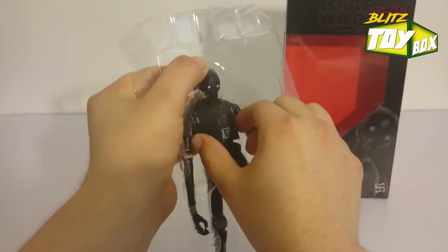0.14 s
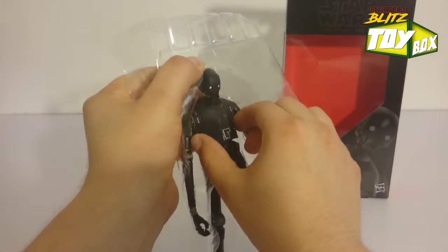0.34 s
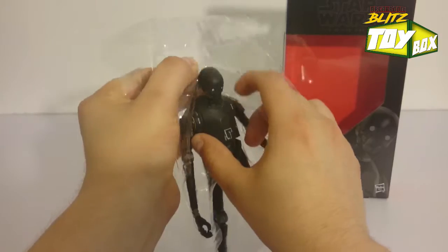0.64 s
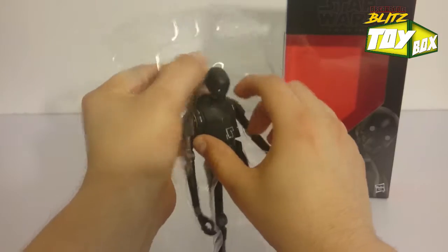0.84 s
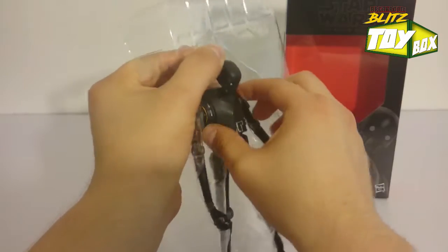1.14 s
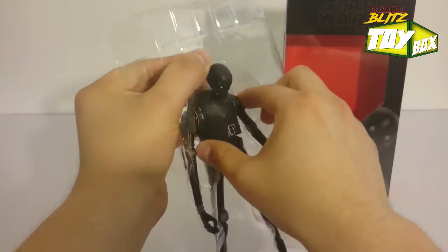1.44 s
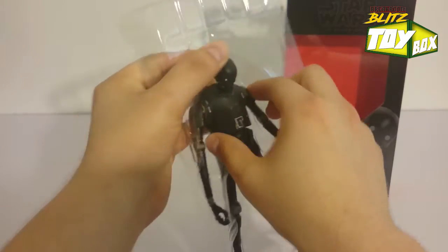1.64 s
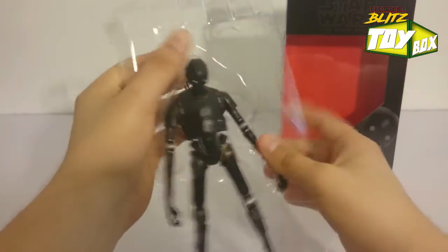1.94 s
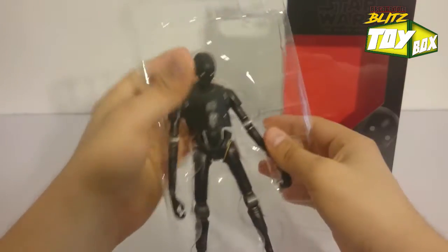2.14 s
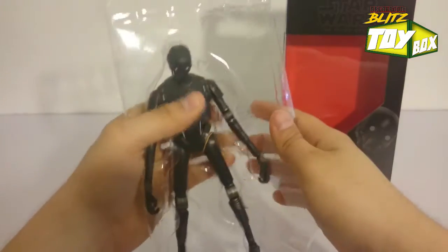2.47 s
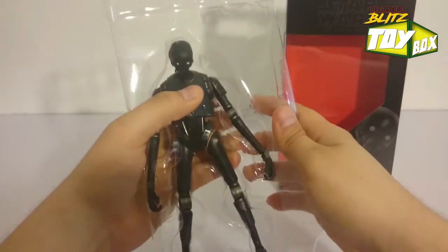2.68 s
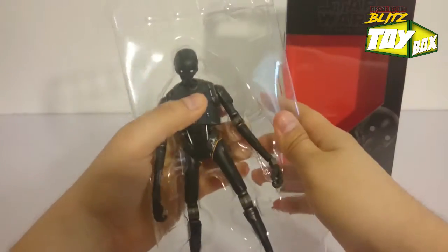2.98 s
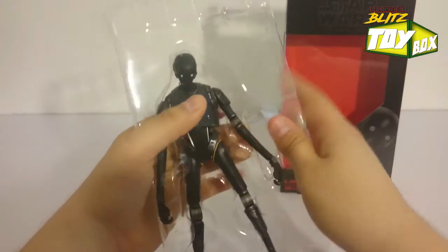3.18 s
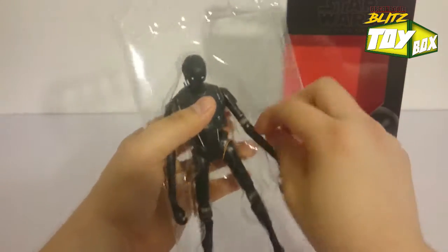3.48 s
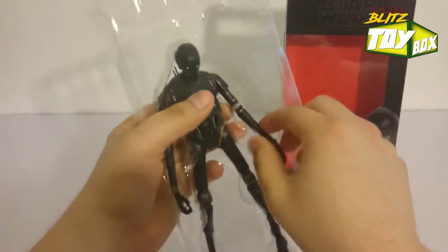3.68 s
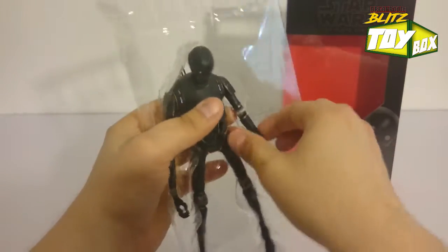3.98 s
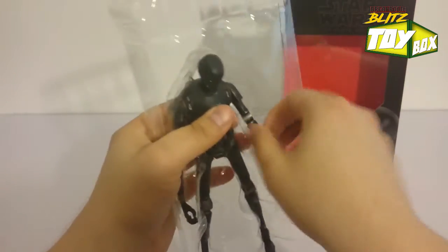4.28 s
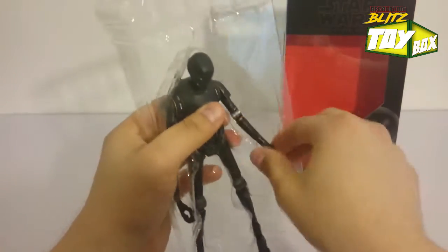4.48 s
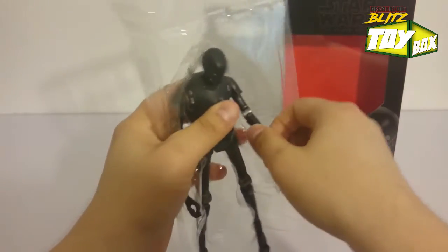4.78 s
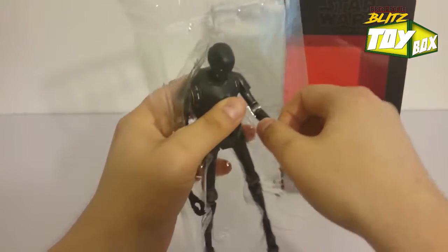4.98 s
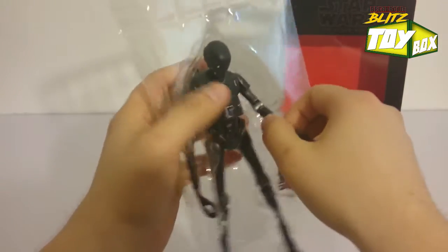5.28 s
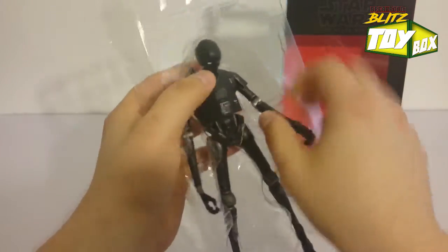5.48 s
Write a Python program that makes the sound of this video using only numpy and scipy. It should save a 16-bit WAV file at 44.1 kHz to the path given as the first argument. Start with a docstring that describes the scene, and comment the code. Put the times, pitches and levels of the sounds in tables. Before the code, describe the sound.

A thin plastic tray is flexed close to the microphone as hands work a toy figure free. It starts crackling at once, with sharp snaps around 0.3 seconds and a loud cluster from 0.6 to 0.9. Another run of snaps follows from about 1.2 to 1.7 seconds. Between them come fine crinkles, tiny pops and soft fingertip rubs. From 1.8 to 2.8 seconds the handling is lighter, with scattered ticks. Brighter cracks return near 3 seconds and from 3.3 to 3.6, then in a tight burst around 4.1, a few with a soft low thump underneath. After that the plastic mostly ticks quietly, with one sharp snap at 4.8 seconds and a few small clicks until about 5.5. The small room adds a very short echo and a faint steady background noise.

```python
"""Toy figure out of its tray

A table in a small room, the camera close by: hands work a toy figure out of a thin, clear plastic tray.
The tray buckles in sharp snaps; between them creases crackle, tiny facets pop and fingertips rub.
The camera's two microphones hear it in different colours, the room answers briefly, loud snaps clip."""
import sys
import numpy as np
from scipy import signal
from scipy.fft import rfft, irfft, next_fast_len
from scipy.io import wavfile
from scipy.ndimage import uniform_filter1d

SR = 44100
rng = np.random.default_rng(int(sys.argv[2]) if len(sys.argv) > 2 else 0)


def to_wav(s):
    """Save 16-bit WAV."""
    ch = np.atleast_2d(s).T  # columns
    pcm = np.round(np.clip(ch, -1, 1) * 32767)  # PCM
    wavfile.write(sys.argv[1], SR, pcm.astype(np.int16))


N = 247842


def amp(db):
    """Decibels to gain."""
    return 10 ** (np.asarray(db) / 20)


def unit(x):
    """x at rms 1."""
    return x / np.sqrt(np.mean(x ** 2) + 1e-20)


def along(points, hz):
    """A curve of (f/Hz, value) points, read on a log frequency axis."""
    f, values = np.transpose(points)
    return np.interp(np.log(hz + 1), np.log(f + 1), values)


def causal(gain):
    """The minimum-phase response with this gain: it rings only after the blow."""
    cepstrum = irfft(np.log(np.maximum(gain, 1e-6)))
    half = cepstrum.shape[-1] // 2
    cepstrum[..., 1:half] *= 2
    cepstrum[..., half + 1:] = 0
    return np.exp(rfft(cepstrum))


def filtered(x, response):
    """x through a response given as a function of frequency."""
    size = 2 * next_fast_len((N + SR // 2) // 2)
    return irfft(rfft(x, size) * response(np.fft.rfftfreq(size, 1 / SR)), size)[..., :N]


def resonance(hz, centre, width):
    """One damped mode, of gain 1 at its centre."""
    return 1j * hz * width / (centre ** 2 - hz ** 2 + 1j * hz * width)


# How alike the camera's two microphones hear the table: f/Hz, correlation
MIC_LIKENESS = [(60, 0.44), (270, 0.9), (740, .8), (980, 0.95), (1450, 0.49), (2300, 0.26), (3300, 0.12),
                (15000, 0.18)]
# How far the right microphone lags the left: f/Hz, phase/rad
MIC_LAG = [(450, 0), (700, 0.9), (950, .5), (1450, 1.57), (2000, 3.5), (3300, 4), (8000, 9)]
def mic_pair(spectra, hz):
    """Two unrelated spectra become left and right, at microphones wired in opposite polarity."""
    angle = np.arccos(np.clip(along(MIC_LIKENESS, hz), -.98, .98)) / 2
    mid, side = np.cos(angle) * spectra[0], np.sin(angle) * spectra[1]
    return np.array([mid + side, -(mid - side) * np.exp(-1j * along(MIC_LAG, hz))])


def stereo(x):
    """Two signals through the microphone pair."""
    size = next_fast_len(N)
    spectra = rfft(x, size)
    hz = np.linspace(0, SR / 2, spectra.shape[1])
    return irfft(mic_pair(spectra, hz), size)[:, :N]


# The small room at rest, heard from the table: f/Hz, relative density/dB
ROOM_TONE = [(25, -9.5), (100, 0), (300, 1), (900, -0.5), (2000, -15.5), (4000, -17.5), (8000, -18),
             (15000, -30)]
def room_tone(level_db=-63):
    """The faint steady noise of the room."""
    noise = stereo(rng.standard_normal((2, N)))
    return amp(level_db) * unit(filtered(noise, lambda hz: amp(along(ROOM_TONE, hz))))


# Centres of the plastic's body, middle, crack and fizz registers: f/Hz
REGISTER_HZ = [900, 2600, 6800, 12500]
def registers(hz):
    """Each register's share of every frequency; neighbours cross-fade."""
    return np.array([along(list(zip(REGISTER_HZ, row)), hz) for row in np.eye(len(REGISTER_HZ))])


# The tray buckling close to the camera; body, crack and fizz are relative to the middle's level:
# t/s, level/dB, facet f/Hz, body/dB, crack/dB, fizz/dB, left minus right/dB
BUCKLES = [(0.0405, -31, 1290, 5.5, -12, -7, -1), (0.051, -19.5, 1980, -5, -16, -16, 6),
           (0.0637, -23, 654, 1.5, -26, -11.5, 10), (0.1468, -11, 5160, -1, -2.5, 8.5, 3),
           (0.2048, -14.5, 2000, 1.5, -14, -19, 4.5), (0.243, -21.5, 2110, -2, -13, -10, 6),
           (0.2623, -17, 2110, 1.5, -2, 1, 3), (.281, -11.5, 3170, -25, 1.5, 0.5, 6.5),
           (0.2913, -3.5, 1910, -8.5, -9.5, -12, -2.5), (.4799, -21, 1350, 12, -2.5, -4, 3),
           (.515, -15, 2420, -2, -13, -1.5, 8.5), (0.5506, -27.5, 1060, 8.5, 4, 10, 0),
           (.594, -14, 1060, 1, -10, -7.5, 7), (0.6218, -5, 1020, 0, -9, -5, 2),
           (0.6279, -16, 990, 4.5, 6, 8, 3), (0.6529, -13.5, 4470, -5.5, -3, 1, 4.5),
           (0.7097, -6, 3550, -17.5, -11.5, -13, 0), (0.7963, -16.5, 7670, -6.5, -0.5, -6.5, 7),
           (.8161, -31.5, 7170, -6, 18.5, 21, 4.5), (0.8349, -26.5, 1240, 8, -5, -13, 1),
           (0.8536, -15.5, 2620, 8, -11, -16.5, 9.5), (0.8756, -10, 780, 4, 4, 5.5, 1),
           (0.8846, -8.5, 900, 3, -6.5, 4, -1), (1.0274, -21.5, 1140, 7.5, -10.5, -10, 2),
           (1.052, -32.5, 850, 5, -4, -5, -1), (1.1343, -41, 930, 16.5, -33, -28, 2),
           (1.169, -21.5, 1360, 7, -17, -24.5, -2), (1.2424, -21, 1500, -2, -16, -16, 5),
           (1.2735, -7.5, 6700, -10, -1.5, -3, 1), (1.3405, -13.5, 1710, -24, -28, -21, 1),
           (1.4068, -16.5, 1110, 2, -29.5, -22, 0.5), (1.437, -35, 9000, -10, -1, 22, 10),
           (1.451, -12, 1420, -2, -2.5, -1, 1), (1.5282, -19.5, 1960, -0.5, -4, 6, 3),
           (1.5908, -12.5, 3140, -11, -20, -13, -0.5), (1.624, -10, 1570, -21, -18, -28, -1),
           (1.663, -18, 6300, -11, -1, 13, 9.5), (1.6974, -18.5, 1140, 5.5, -11, -5, -5.5),
           (1.7052, -18.5, 1100, 12.5, -8, -22, 1.5), (1.807, -28, 1700, 6.5, -10, -24, -3.5),
           (1.9652, -28, 900, 11.5, -7, -2, 6), (2.025, -18.5, 1330, -5, -24, -8, 4.5),
           (2.0356, -26.5, 1310, 7, 0.5, -22, -4.5), (2.0805, -20, 2400, -1.5, -9, -32, 0),
           (2.1232, -19.5, 1200, 6.5, -3.5, 8.5, 0.5), (2.1769, -27.5, 1200, 3.5, -17, -3, 0),
           (2.2193, -24, 1250, 0.5, -5, 6, 0), (2.2927, -35, 1120, 8, -27, 3, -0.5),
           (2.3786, -23.5, 990, 4.5, -12, -11, 3), (2.42, -28.5, 1190, 2.5, -19, -20, 2.5),
           (2.4999, -33.5, 590, -3.5, -6, 4, 6), (2.5465, -25, 2240, 0, -0.5, -1, -1.5),
           (2.6671, -21, 930, 0, -12, -11.5, 1), (2.6886, -21.5, 6300, 1, -2, -1.5, 4),
           (2.7504, -23, 4100, -6.5, 2, -3.5, 0.5), (2.8018, -27, 845, 0.5, -34, -30, -2.5),
           (2.8272, -22.5, 1800, 5, -13, -8.5, 3.5), (2.8685, -16, 6160, -5.5, 3, 6, 3.5),
           (2.882, -27, 5500, -6, 3, -6, 7.5), (2.8893, -18, 4000, -15.5, -3, -18.5, -1),
           (2.97, -8, 8900, -9.5, -4, 7.5, 7.5), (3.0439, -25.5, 1100, 8, -37, -9.5, 0),
           (3.1048, -32, 1130, 3.5, -30, -23, -2.5), (3.1525, -16.5, 1870, -8, -23.5, -20, 3.5),
           (3.1989, -23.5, 1230, -0.5, -14, -7.5, 8), (3.256, -16.5, 4200, -5, 7, 13, 1.5),
           (3.3553, -16, 8500, -11.5, 0, 4.5, 3.5), (3.3755, -26.5, 676, 8, 10.5, 13, 1.5),
           (3.393, -26.5, 6000, -2.5, 4, 12, -2.5), (3.4206, -14, 5100, -6.5, 2, 1, -1.5),
           (3.4775, -9.5, 3940, -2.5, 6, 6, -3), (3.565, -31, 9100, -15, 7, 23, 5),
           (3.5792, -20, 6150, -5, 9.5, 13, 3), (3.615, -23.5, 5670, -9, 12.5, 21.5, 0),
           (3.6759, -29, 1800, 4, 1.5, 0, -8), (3.7792, -26, 3790, -21.5, 1, -24, -3),
           (3.943, -22, 1810, -2.5, -19, -8.5, 1), (3.9883, -21.5, 1780, 4.5, -12, -26.5, 10),
           (4.049, -13.5, 3050, -2, -5.5, -11, 3), (4.062, -18, 3860, -17.5, 10.5, 12, 3),
           (4.073, -17.5, 3200, -10.5, 4, -11, -7), (4.0813, -18.5, 3230, 3, 6, 12, 4.5),
           (4.1059, -11, 8220, -4.5, 1, 12, 2), (4.1099, -20, 1850, 16, 7, 11, 3),
           (4.132, -14, 3900, -19, 1, -21, -4), (4.3171, -38.5, 1150, 14.5, 2, -20, -4),
           (4.3458, -28.5, 624, -3, -12, -17, 1), (4.5111, -30, 2200, 6, -2, -12, -0.5),
           (4.5389, -34, 1420, 3, -8, -24, -7.5), (4.583, -33, 820, 6, -21, -31.5, 1.5),
           (4.699, -33, 1870, -0.5, -4, -3.5, -0.5), (4.711, -36.5, 1720, 11.5, -9, -11, -1),
           (4.755, -39.5, 1320, 17.5, -9, -6, -2.5), (4.7862, -9, 4750, -9, 3, -2, 0.5),
           (4.86, -40, 9000, -12, 14.5, 33, 2.5), (5.0463, -38.5, 3620, -6.5, -8, -1, -2),
           (5.1648, -22.5, 1000, 1, -10.5, -9, -0.5), (5.216, -28.5, 1030, 1.5, -13, -6, 0.5),
           (5.26, -27, 2000, 0, -5, -14, -3.5), (5.4444, -36.5, 1790, -5, -12, -28, -1),
           (5.5398, -21, 2150, -10, -24, -24, -0.5)]
def snaps(attack_s=0.0003, kick=1.8, creep_db=-17, creep_s=0.0021, damping_hz=3300, size=2048):
    """A crease creeps, gives way with a kick, and bending waves scatter briefly through the sheet."""
    lead, level_span = SR // 250, SR * .005  # samples
    t = (np.arange(size) - lead) / SR
    after = np.maximum(t, 0)
    creep = amp(creep_db) * np.exp(-np.abs(t) / creep_s)
    hz = np.fft.rfftfreq(size, 1 / SR)
    shares = registers(hz)
    weights = shares * np.abs(tray(hz))[:, None] ** 2
    weights /= weights.sum(-1, keepdims=True)
    out = np.zeros((2, N + 2 * size))
    for s, db, facet_hz, body_db, crack_db, fizz_db, pan_db in BUCKLES:
        noise = rng.standard_normal((2, size))
        t60 = 0.023 * (1210 / facet_hz) ** 0.23  # smaller, higher facets die sooner
        scatter = (1 - np.exp(-after / attack_s)) * amp(-60 * after / t60)
        burst = noise * (scatter + creep)
        burst[:, lead + SR // 5000] += kick * np.sign(noise[:, 0])
        # the facet that flips rings at its own pitch; the plastic damps the high ones
        strength = 2.72 / (1 + (facet_hz / damping_hz) ** 2)
        ring = strength * resonance(hz, facet_hz, width=0.15 * facet_hz)
        spectrum = mic_pair(rfft(burst), hz) * (1 + ring)
        spectrum *= 1j * hz / (90 + 1j * hz)  # a small facet moves little air below 90 Hz
        # each snap has its own balance of body, crack and fizz, dull or bright
        wanted_db = db + np.array([body_db, 0, crack_db, fizz_db]) + np.array([[pan_db], [-pan_db]]) / 2
        burst_db = 10 * np.log10((weights * np.abs(spectrum[:, None]) ** 2).sum(-1) / level_span)
        colour = causal(amp((wanted_db - burst_db) @ shares))
        out[:, round(s * SR):][:, :size] += irfft(spectrum * colour)
    return out[:, lead:lead + N]


# The tray at close range, at the left and at the right microphone: f/Hz, relative density/dB
TRAY_AT_LEFT = [(30, -39.5), (150, -31.5), (270, -24), (370, -29.5), (500, -19.5), (760, -12), (940, -4),
                (1400, -15), (2600, -10.5), (4700, -16.5), (6400, -7.5), (9700, -19.5), (12000, -36.5),
                (15500, -40.5)]
TRAY_AT_RIGHT = [(30, -33), (150, -32), (270, -20.5), (370, -21.5), (540, -8), (770, -10.5), (920, 2.5),
                 (1500, -4.5), (2300, -5.5), (4000, -9), (5000, -14), (7000, -16), (10700, -29),
                 (15500, -32.5)]
# Its resonances on top of that: f/Hz, width/Hz, left/dB, right/dB
TRAY_RESONANCES = [(1269, 91, 5, 3), (1792, 350, 2, 2.5), (3140, 170, -6.5, 6), (3850, 460, 0, 7),
                   (12300, 1100, -1, 2)]
def tray(hz):
    """The thin sheet's response at the two microphones, with a mean power of 1."""
    db = np.array([along(TRAY_AT_LEFT, hz), along(TRAY_AT_RIGHT, hz)])
    for centre, width, left_db, right_db in TRAY_RESONANCES:
        db += np.outer([left_db, right_db], np.exp(-2 * ((hz - centre) / width) ** 2))
    return causal(unit(amp(db)))


# Fingers squeezing the tray: t/s, length/s, level/dB, brightness/(dB per octave)
FINGER_SQUEEZES = [(0.041, .075, -28.5, -3), (0.244, 0.067, -25, -8.5), (0.469, 0.13, -29.5, -3.5),
                   (0.622, 0.26, -29.5, -1), (0.826, 0.055, -18.5, -2.5), (1.18, 0.13, -38, -4.5),
                   (1.27, 0.29, -33, -3), (1.603, 0.1, -27.5, -2.5), (1.972, 0.016, -34.5, -8.5),
                   (2.083, 0.35, -43.5, -4), (2.5, 0.26, -45, -5), (2.848, 0.15, -31, -5.5),
                   (3.138, 0.19, -35.5, -4.5), (3.353, 0.23, -30.5, -3), (3.674, 0.25, -35, -4.5),
                   (3.991, 0.16, -29, -3), (4.268, 0.1, -45.5, -8.5), (4.498, 0.056, -40.5, -6),
                   (4.795, 0.025, -32.5, 0), (5.06, 0.045, -45.5, -3.5), (5.18, 0.14, -42, -5.5),
                   (5.453, 0.059, -42, -4)]
def squeeze(times, attack_db_per_s=1398.5, sag_db=2, release_db_per_s=230, resting_db=-56.5):
    """Level and brightness under the fingers: each squeeze sets in fast, sags a little and lets go."""
    start, length, db, tilt = np.transpose(FINGER_SQUEEZES)[:, :, None]
    before, past = np.maximum(start - times, 0), np.maximum(times - start - length, 0)
    progress = np.clip((times - start) / length, 0, 1)
    each_db = db - sag_db * (progress - .5) - attack_db_per_s * before - release_db_per_s * past
    return np.maximum(each_db.max(0), resting_db), tilt[each_db.argmax(0), 0]


def crackle(per_s=125, size_spread_db=4.5, colour_spread_db=4, decay_s=0.0013, rub_db=-16):
    """Small creases tick at random, some dull and some bright, over the soft rub of fingers on plastic."""
    squeeze_db, tilt = squeeze(np.arange(N) / SR)
    fires = rng.random(N) < per_s / SR
    sizes = amp(size_spread_db * np.minimum(rng.exponential(size=N), 3.5))
    decay = np.exp(-2 * np.arange(400) / SR / decay_s)
    out = np.zeros((2, N))
    for band, centre in enumerate(REGISTER_HZ):
        ticks = fires * sizes * amp(colour_spread_db * rng.standard_normal(N))
        power = np.abs(signal.fftconvolve(ticks ** 2, decay)[:N])
        # a steady push releases a steady amount of energy, in few large ticks or many small ones
        power /= np.abs(uniform_filter1d(power, SR // 12)) + 0.18 * power.mean()
        colour_db = tilt * np.log2(min(centre, 8000) / 2200)
        envelope = np.sqrt(power + amp(rub_db) ** 2) * amp(squeeze_db + colour_db - 0.5)
        grains = envelope * rng.standard_normal((2, N))
        out += filtered(grains, lambda hz: np.sqrt(registers(hz)[band]))
    return stereo(out)


def pops(per_s=55, pitch_hz=1700, pitch_spread=.45, decay_cycles=2.2, gain_db=-5, spread_db=3, size=700):
    """Tiny facets flip at random under the fingers, each ringing for a few cycles at its own pitch."""
    starts = np.flatnonzero(rng.random(N) < per_s / SR)
    pitch_draw, size_draw, *angles = rng.standard_normal((len(starts), 4)).T[:, :, None]
    squeeze_db, _ = squeeze(starts / SR)
    hz = pitch_hz * np.exp(pitch_spread * np.clip(pitch_draw, -2, 2))
    db = squeeze_db[:, None] + gain_db + spread_db * np.minimum(size_draw, 1)
    cycles = hz * np.arange(size) / SR
    envelope = amp(db) * (1 - np.exp(-2 * cycles)) * np.exp(-cycles / decay_cycles)
    # each microphone hears the facet from its own angle
    rings = [envelope * np.sin(2 * np.pi * cycles + np.pi * angle) for angle in angles]
    samples = (starts[:, None] + np.arange(size)).ravel()
    return stereo(np.array([np.bincount(samples, ring.ravel(), N)[:N] for ring in rings]))


# The small room's decay: f/Hz, t60/s
ROOM_DECAY = [(200, 0.2), (600, 0.3), (1200, 0.25), (4000, 0.25), (8000, 0.23), (15000, 0.21)]
# Its tail against the direct sound, at the camera: f/Hz, level/dB
ROOM_TAIL = [(200, 2), (1000, -9), (3500, -5.5), (7000, -7), (13000, -3.5)]
def room(x, gap_s=0.0075, gap_spread=.15, wall_db=-13, block_size=8192):
    """The near wall answers, a short diffuse tail follows; both change as the tray moves."""
    length = SR // 2
    tails, wall = np.zeros((2, 2, N + block_size + 2 * length))
    for start in range(0, N, block_size):
        hz, t, noise = signal.stft(rng.standard_normal((2, length)), SR, nperseg=256)
        decay = amp(-60 * t / along(ROOM_DECAY, hz)[:, None])
        _, tail = signal.istft(noise * decay, SR, nperseg=256)
        tail /= np.linalg.norm(tail, axis=1, keepdims=True)
        block = x[:, start:start + block_size]
        answer = signal.fftconvolve(block, tail, axes=1)
        arrival = start + round(gap_s * SR * np.exp(gap_spread * rng.uniform(-1, 1)))
        tails[:, arrival:][:, :answer.shape[1]] += answer
        wall[:, arrival:][:, :block.shape[1]] += block
    diffuse = filtered(stereo(tails[:, :N]), lambda hz: amp(along(ROOM_TAIL, hz)))
    return diffuse + amp(wall_db) * wall[:, :N]


# Low thumps at the camera's microphones: t/s, level/dB
LOW_THUMPS = [(.292, -47.5), (.878, -48.5), (1.7, -48), (2.974, -40), (3.476, -33.5), (4.107, -36)]
def thumps(pitch_hz=110, decay_s=0.0051, size=8192):
    """Short low thumps under a few of the snaps, each a quickly damped sine."""
    t = np.arange(size) / SR
    thump = np.sin(2 * np.pi * pitch_hz * t) * np.exp(-t / decay_s)
    out = np.zeros((2, N + size))
    for s, db in LOW_THUMPS:
        out[:, round(s * SR):][:, :size] += amp(db) * thump
    return stereo(out[:, :N])


# Fingertips on the plastic, close to the camera: middle t/s, length/s, f/Hz, level/dB
FINGER_RUBS = [(0.304, 0.048, 516, -34), (0.491, 0.031, 477, -33), (0.504, 0.05, 292, -41.5),
               (0.886, 0.029, 295, -35.5), (2.307, .03, 640, -47.5), (2.5, 0.013, 534, -39.5),
               (2.501, .012, 1320, -35.5), (2.499, 0.0086, 3020, -40), (3.389, 0.052, 624, -37),
               (4.102, 0.02, 497, -31), (5.49, 0.014, 580, -41)]
def rubs(relative_width=0.36, size=8192):
    """Skin drags on the tray: a short swell of narrow noise, hollow or squeaky."""
    t = np.arange(size) / SR
    hz = np.fft.rfftfreq(size, 1 / SR)
    out = np.zeros((2, N + 2 * size))
    for s, length, pitch_hz, db in FINGER_RUBS:
        stroke = np.exp(-2 * ((t - t.mean()) / length) ** 2)
        band = resonance(hz, pitch_hz, relative_width * pitch_hz) ** 2
        rub = stroke * irfft(rfft(rng.standard_normal((2, size))) * band)
        rub *= np.linalg.norm(stroke) / np.linalg.norm(rub, axis=1, keepdims=True)
        out[:, round(s * SR) - size // 2:][:, :size] += amp(db) * rub
    return stereo(out[:, :N])


def scene():
    """At the camera: the plastic and its echo in the tray's colour, dull thumps and rubs, room tone."""
    plastic = snaps() + pops() + crackle()
    dull = (thumps() + rubs()) * amp([[-2.5], [2.5]])  # louder at the right microphone
    return filtered(plastic + room(plastic), tray) + dull + amp(-2.5) * room(dull) + room_tone()


def record(dry, hardness=5, top_hz=15900):
    """The camera flattens the loudest snaps at full scale and keeps nothing above its band limit."""
    clipped = dry / (1 + np.abs(dry) ** hardness) ** (1 / hardness)
    return filtered(clipped, lambda hz: 1 / (1 + (hz / top_hz) ** 120))


dry = scene()
out = record(dry)
to_wav(out)
```